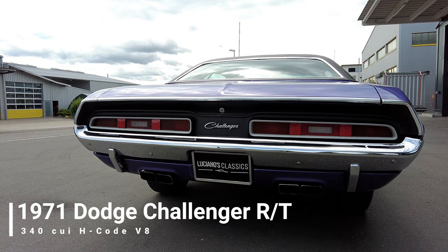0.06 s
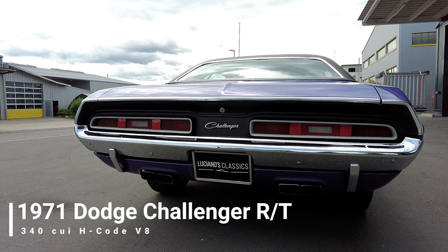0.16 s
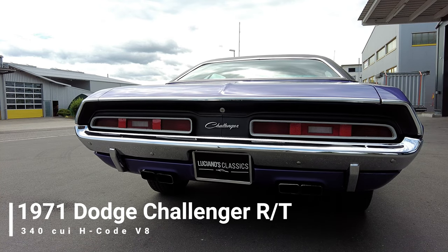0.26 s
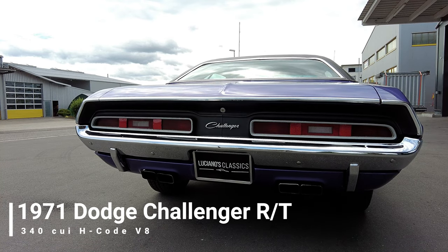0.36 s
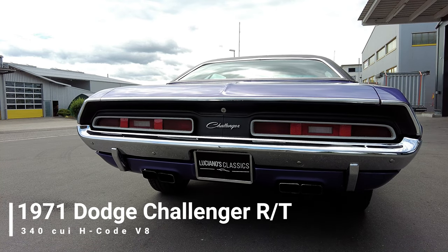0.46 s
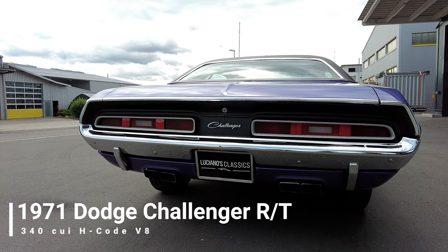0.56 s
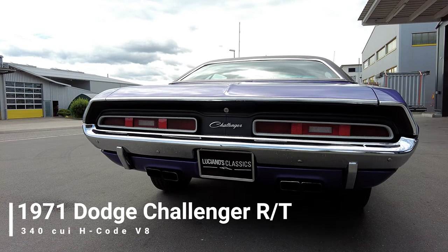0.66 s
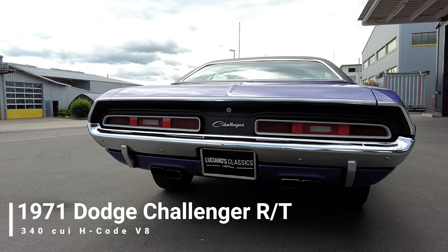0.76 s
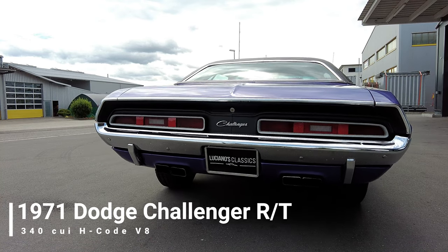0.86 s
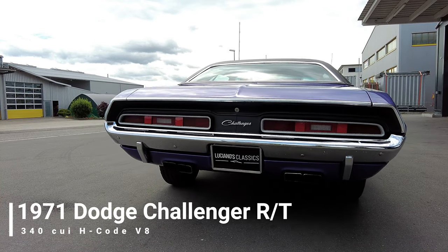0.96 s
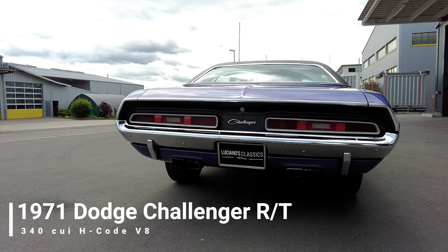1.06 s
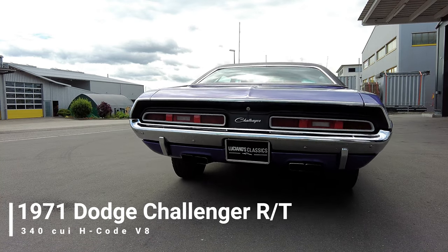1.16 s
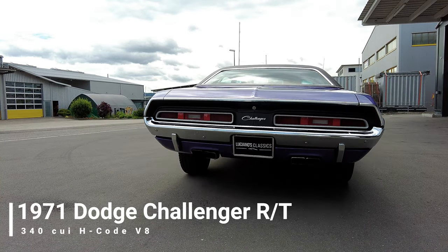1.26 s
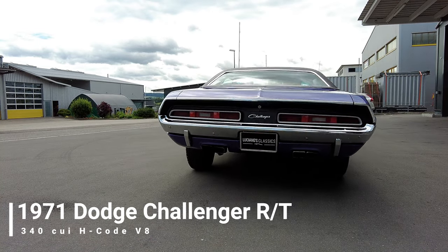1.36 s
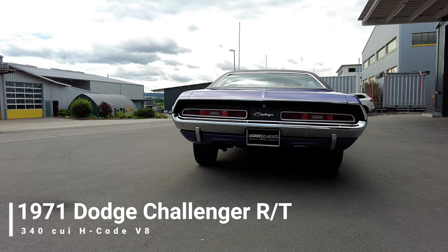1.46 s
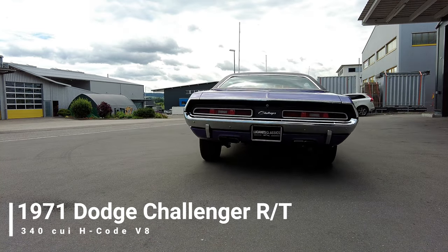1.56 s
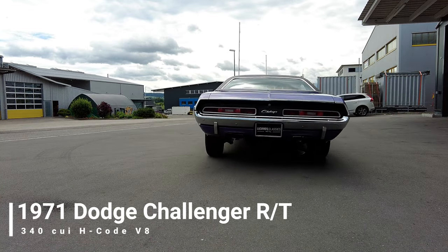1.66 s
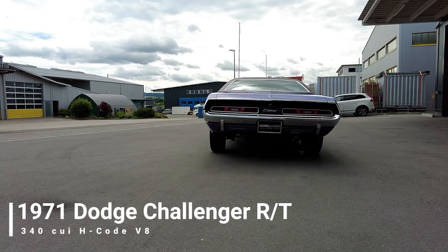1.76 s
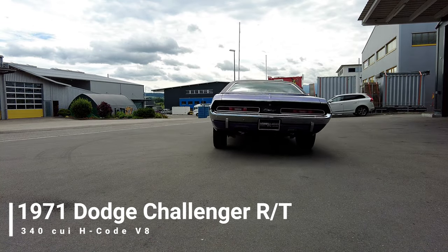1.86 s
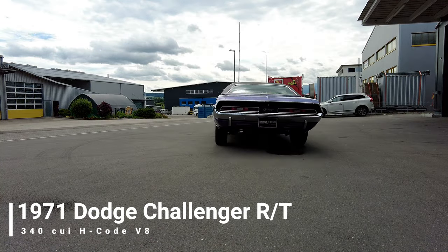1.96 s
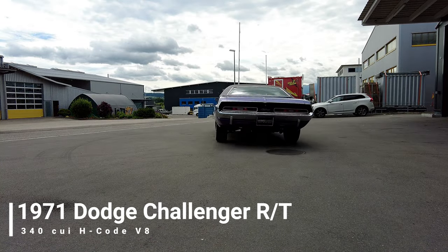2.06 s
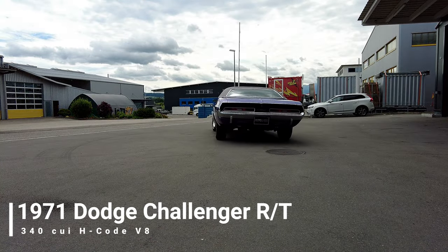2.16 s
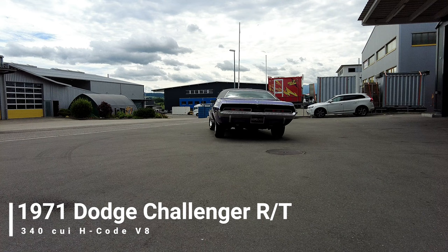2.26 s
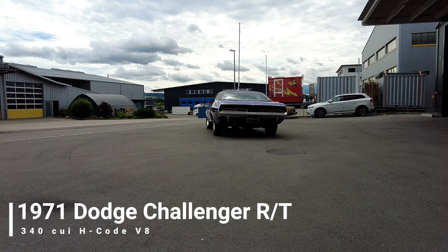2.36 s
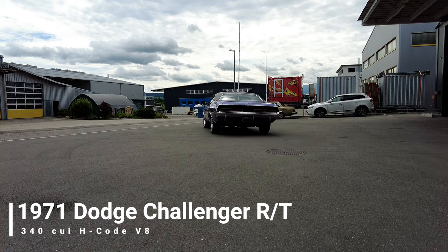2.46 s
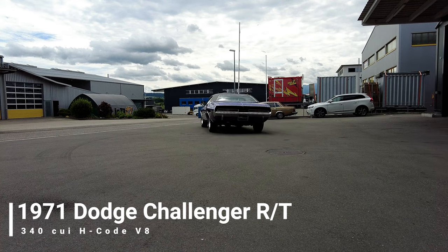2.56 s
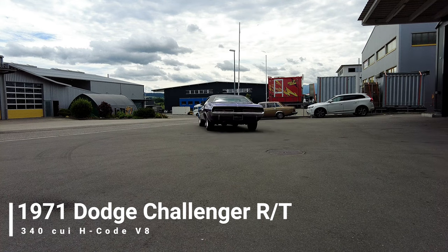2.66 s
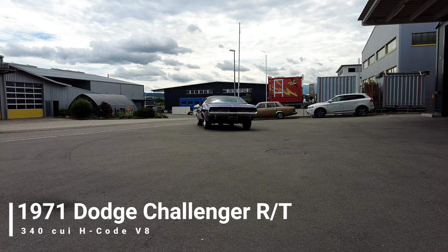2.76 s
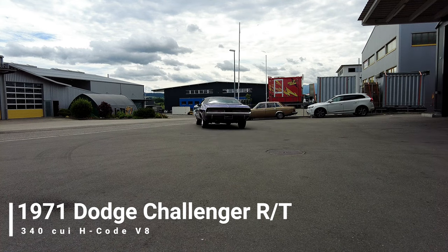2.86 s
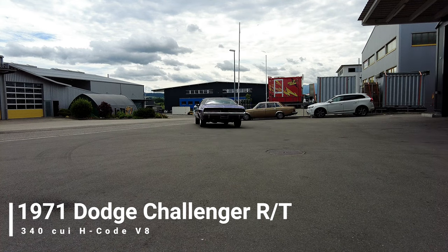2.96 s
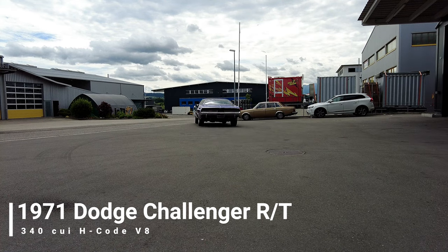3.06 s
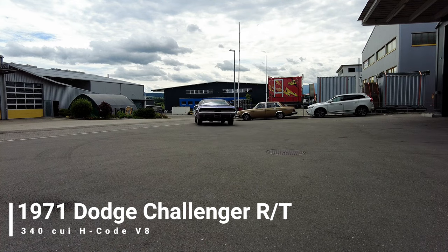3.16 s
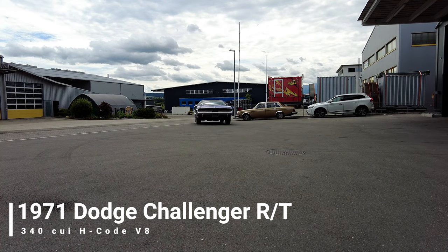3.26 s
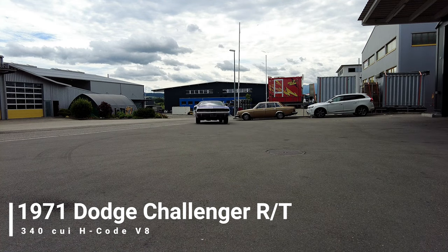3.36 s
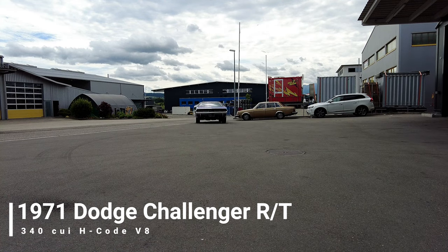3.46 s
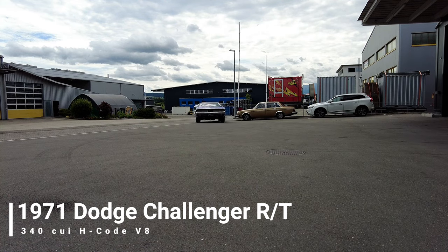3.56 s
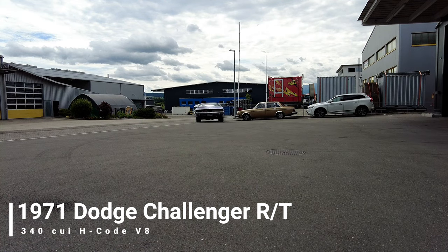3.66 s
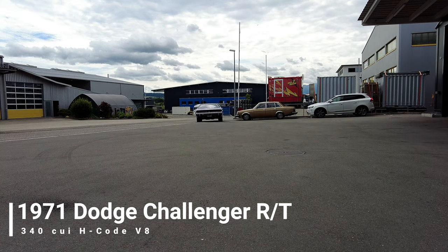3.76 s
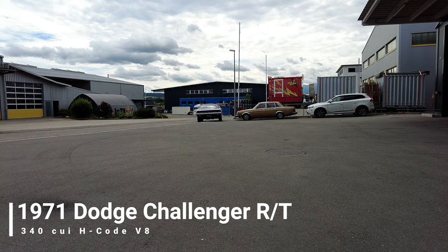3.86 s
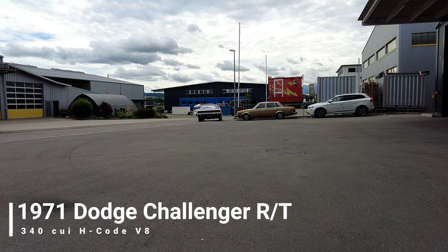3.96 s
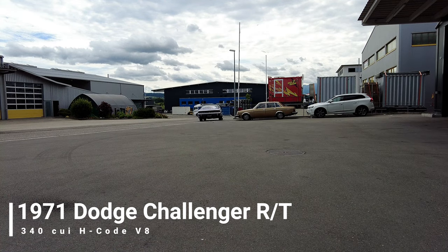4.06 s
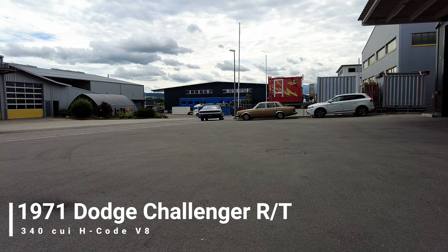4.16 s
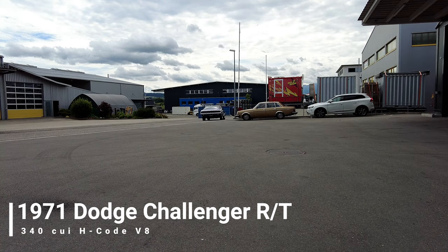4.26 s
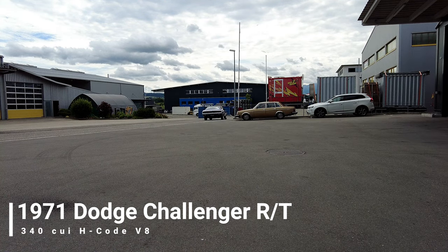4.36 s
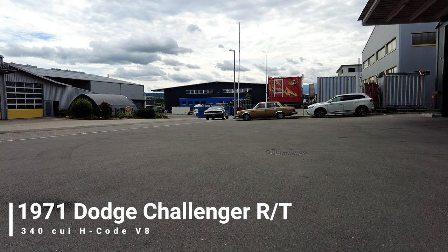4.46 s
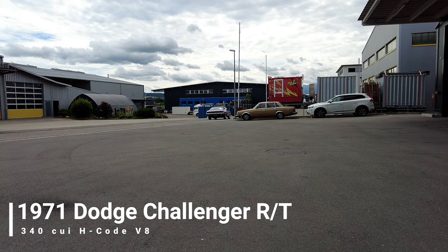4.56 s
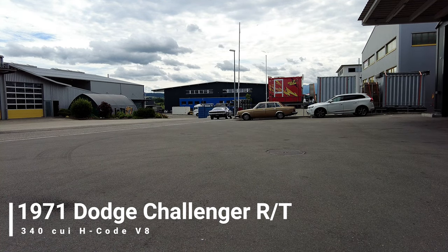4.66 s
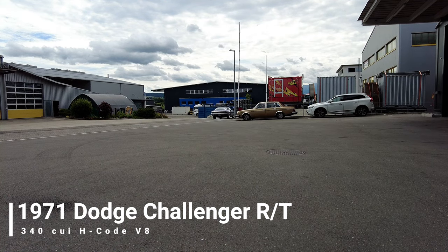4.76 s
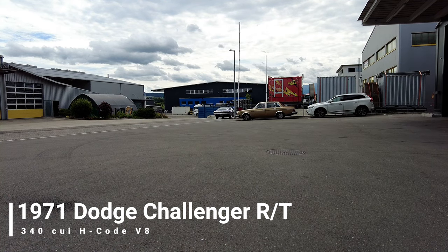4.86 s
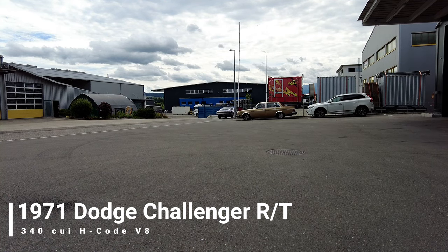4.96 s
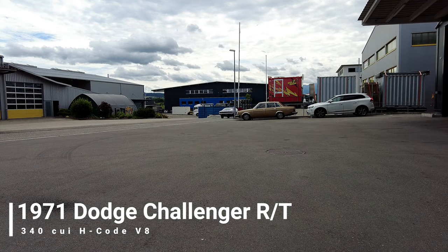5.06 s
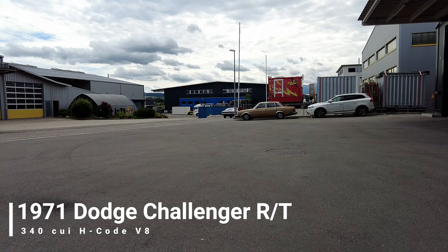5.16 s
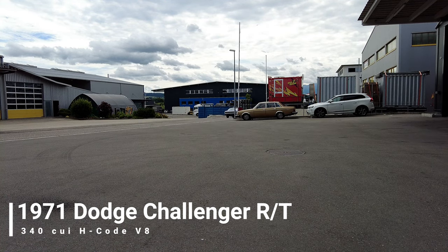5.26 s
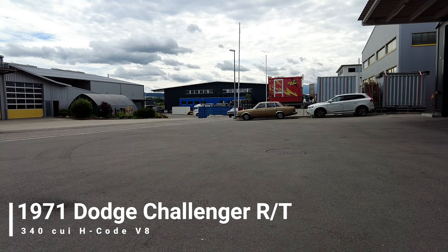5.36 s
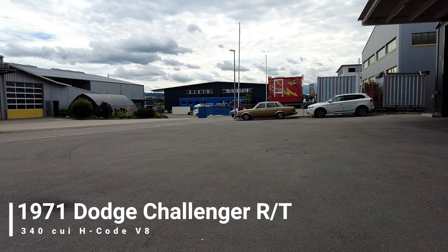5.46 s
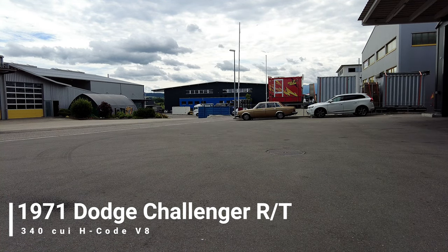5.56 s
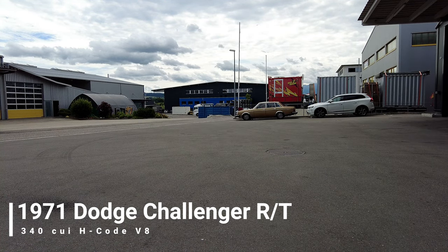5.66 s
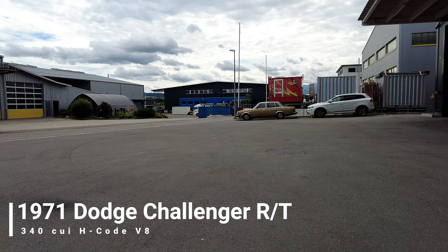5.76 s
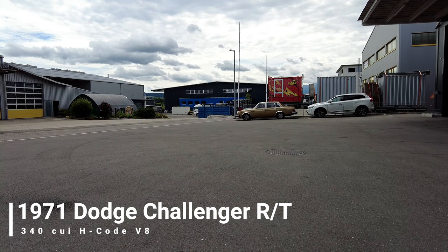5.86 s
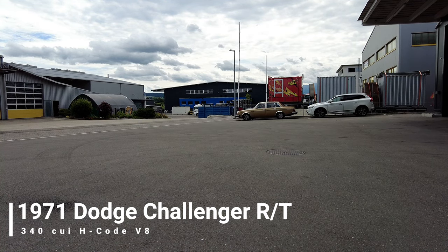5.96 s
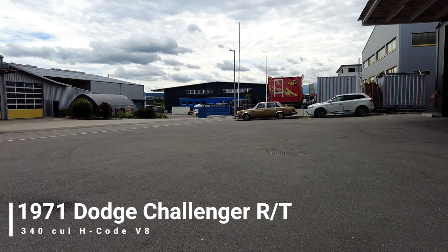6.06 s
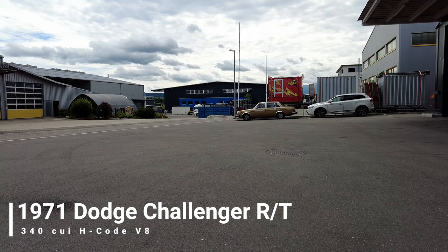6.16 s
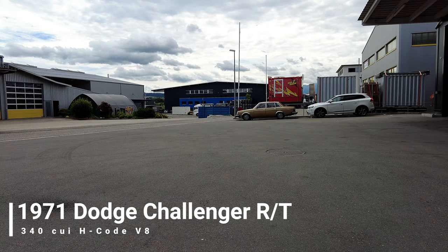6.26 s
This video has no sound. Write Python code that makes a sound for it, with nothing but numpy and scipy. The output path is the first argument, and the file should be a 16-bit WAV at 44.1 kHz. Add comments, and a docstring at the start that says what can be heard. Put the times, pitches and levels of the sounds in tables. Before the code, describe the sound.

A stationary microphone at ground level hears an old V8 muscle car launch from very close. Soft hollow idle puffs and deep boom give way to pops, uneven slaps and a loud exhaust howl with gritty hiss and metallic chirping. The sound shrinks as the car leaves, revs rise to a peak, fall at the shift, and a distant reverberant drone remains among the yard walls.

```python
"""A low idle throb climbs into a hard bark, sags, climbs again and drops at a gear change.
A V8 car is pulling away across a paved yard, heard from just behind its tailpipes.
Uneven exhaust pulses excite the pipe resonances and gate turbulent noise into hiss; multiples of the
engine cycle form boom, rumble and howl. As the path lengthens, the echoes off the walls gain on the
bark, howl and rasp."""
import sys
import numpy as np
from scipy import signal
from scipy.fft import rfft, irfft
from scipy.io import wavfile
from scipy.ndimage import uniform_filter1d

SR = 44100
rng = np.random.default_rng(int(sys.argv[2]) if len(sys.argv) > 2 else 0)


def output_pcm(signal):
    """Save a mono or channel-first signal as 16-bit PCM at the path in sys.argv[1].

    Samples are clipped to [-1, 1] before scaling.
    """
    pcm = np.clip(np.atleast_2d(signal).T, -1, 1) * 32767
    wavfile.write(sys.argv[1], SR, np.round(pcm).astype(np.int16))


N = 278271
TIME = np.arange(N) / SR

# background spectrum of the yard: (f/Hz, relative level/dB)
FLOOR_SPECTRUM = [(25, 8.5), (60, -1), (130, 3), (220, 7.5), (400, -1.5), (1000, -2), (3000, -30),
                  (8000, -63), (15000, -76)]
FLOOR_DB, CUTOFF_HZ = -43, 15400

# engine speed: (t/s, firing rate/Hz)
FIRING_RATE = [(0.0, 39.28), (0.17, 37.32), (0.31, 42.91), (0.45, 81.45), (0.62, 102.66), (0.94, 159.04),
               (1.17, 184.4), (1.42, 192.51), (1.98, 166.9), (2.28, 162.36), (2.85, 182.43), (3.2, 197.31),
               (3.55, 219.77), (3.85, 245.35), (4.11, 243.87), (4.2, 165), (4.42, 157), (6.12, 181),
               (6.31, 182)]
# throttle opening: (t/s, opening 0-1)
THROTTLE = [(0.0, 0.0), (0.3, 0.24), (0.47, 0.72), (0.9, 0.75), (1.0, 0.61), (1.07, 0.82), (1.58, 1.0),
            (1.85, 0.94), (2.7, 0.86), (4.08, 1), (4.2, 0.8), (5.3, 0.75), (6.08, 0.63), (6.31, 0.14)]
# the car stands, gathers speed from the bite of the clutch to the gear change, then rolls on
START_M, CLUTCH_S, SHIFT_S, ACCELERATION_M_PER_S2 = 1.67, 0.57, 3.95, 4.13
CRUISE_PER_S = 180  # reference firing rate

# exhaust pulses in firing order: (relative level/dB, lateness/firing intervals)
CYLINDERS = [(-6.3, .12), (.3, .05), (-3.5, -.1), (-4.2, .11), (-9.3, -.26), (-.1, .04), (-7, .1),
             (-12, -.05)]
# hiss of each cylinder's puff in firing order: relative level/dB
PUFF_DB = [5, 14, 8, 13, 25, -3, 16, -20]
# crack of each cylinder's pressure front in firing order: relative level/dB
CRACK_DB = [-18, 0, -8, -18, -20, -6, -11, -22]
# combustion smooths out as the revs rise: (firing rate/Hz, roughness 0-1)
ROUGH_BY_RATE = [(65, .87), (135, .55), (160, .23), (180, .16)]
FAR_BLUR, BLUR_M, SHIFT_ROUGH, SHIFT_LENGTH_S = .2, 22, .4, .2

# loudness laws: (level/dB at full throttle, cruising revs and the start; loss/dB with throttle shut;
# gain/dB per doubling of revs; loss/dB per doubling of distance; loss/dB per m)
BARK_LAW = (-9, 18, 3, 4, 0.13)
RASP_LAW = (-19.5, 19.5, 4, 2, 0.3255)
HISS_LAW = (-24.5, 19.5, -1.5, 3.0, 0.33)

# engine harmonics: (multiple of the four-stroke cycle rate, near level/dB, far level/dB), relative
RUMBLE_ORDERS = [(2, -4, -9), (3, 0, 0), (4, -5, -3), (5, -12, -4), (6, -9, -9)]
# the howl, the orders that the limping pulses stress most; same columns
HOWL_ORDERS = [(10, 0, -1), (11, 3, -1), (12, -2, 0), (13, -6, 2), (14, -2, -2), (16, 9, 6), (17, -2, -1),
               (18, 8, 6), (19, -5, -2), (20, 8, 0), (21, -1, 8), (22, 7, -2), (23, 5, 6), (24, 7, -4),
               (25, -1, -2), (26, 7, 2), (29, -3, 5), (31, 0, 3), (33, -3, 1), (34, 6, -3), (36, 1, -6),
               (37, -3, 5), (38, 5, -4), (39, -1, -6), (41, 0, -1), (42, 3, 1), (45, 1, -1)]
# what the silencers let through of the howl: (f/Hz, relative level/dB)
HOWL_COLOUR = [(200, -1), (260, -1), (300, 2), (335, 0), (372, 6), (405, 6.5), (440, 4), (480, 2),
               (540, 3.5), (600, 2), (680, -4), (770, 0), (830, 1), (900, -2.5), (1000, -5), (1130, -9)]
# level of the low rumble: (t/s, level/dB)
RUMBLE_LEVEL = [(0, -32), (0.45, -25), (0.95, -21.5), (1.1, -22.5), (1.55, -19), (2.2, -24.5), (3.05, -32),
                (3.5, -31.5), (4.25, -35), (4.8, -40.5), (5.6, -41.5), (6.15, -44.5), (6.31, -47)]
# low orders that swell as the echoes add up: (t/s, multiple of the cycle rate, level/dB, half length/s)
BLOOMS = [(0.492, 5, -17, 0.13), (3.15, 3, -31.5, .24), (3.974, 5, -30, 0.053), (4.207, 8, -35, 0.041),
          (4.38, 4, -43, 0.06), (4.473, 8, -39, 0.046), (4.63, 5, -37, 0.089), (5.087, 4, -47, .13),
          (5.424, 5, -40, 0.14), (6.062, 5, -40, .11)]
# how strongly the pipes pass the boom at full throttle: (firing rate/Hz, level/dB)
BOOM_RESPONSE = [(37, 6), (43, 4.5), (55, 3), (85, -8), (135, -11.5), (165, -16), (177, -19), (188, -30),
                 (205, -22), (245, -20.5)]
# dips in the boom: (t/s, depth/dB, half length/s)
BOOM_DIPS = [(4.13, 11, 0.091), (4.5, 7.5, 0.36), (5.14, 11.7, 0.29), (6.25, 6.6, 0.15)]
BOOM_REACH_M, BOOM_FALLOFF = 9, 1.16  # the boom is halved at this distance; power of its fall beyond
BOOM_SHUT_DB = 10.5  # lost with the throttle shut

# pipe and silencer resonances: (f/Hz, bandwidth/Hz, relative level/dB)
BARK_MODES = [(276, 130, 2.5), (393, 90, 3.5), (501, 240, 5.5), (778, 95, 5)]
RASP_MODES = [(874, 390, 15), (1397, 400, 15.5), (1760, 160, -3), (2490, 460, 3), (3220, 28, -1)]
# hollow puffs at idle; same columns
IDLE_MODES = [(350, 90, 2), (495, 63, 7), (630, 160, 4), (810, 110, -16)]
# valve gear and loose metal; same columns
CLATTER_MODES = [(1900, 160, -0.5), (2770, 880, -7), (4280, 55, -15)]
# high squeaks that pulse with the cycle; same columns
CHIRP_MODES = [(5340, 330, 5.8), (5910, 200, 12.5), (6730, 450, 15), (7420, 500, 10.7), (8430, 680, 8)]
# treble bands that ring as the car gathers speed; same columns
SIZZLE_MODES = [(2870, 230, 1), (3560, 130, 1.5), (4820, 270, -1), (6470, 870, -3.5), (7540, 1260, -4.5)]

# spectrum of the gas jets: (f/Hz, relative level/dB)
HISS_SPECTRUM = [(2000, -110), (3000, -2.5), (3450, -1.5), (4000, -7), (4800, -3), (5350, -5.5),
                 (6400, -2.5), (7900, -4), (9200, -13.5), (10500, -22), (13500, -26.5), (15500, -34)]
# left-right likeness of the hiss: (f/Hz, correlation)
LIKENESS = [(2000, .95), (3200, 0.77), (5000, 0.25), (7000, 0.75), (9000, 1), (14000, 0.53)]
# bouts of thin chirping: (t/s, level/dB, half length/s)
CHIRPS = [(0.84, -32.5, 0.49), (1.196, -35, 0.2), (2.867, -37, 0.043), (5.3, -72, 0.45)]
# exhaust pops as the throttle opens: (t/s, relative level/dB)
POPS = [(0.428, -26), (0.466, -8), (0.49, -12), (0.502, -13), (0.524, -6), (0.546, -18), (0.574, -19),
        (0.586, -26), (0.607, -15), (0.627, -9), (0.635, -10), (0.653, -8), (0.7, -14), (0.732, -23),
        (0.74, -20), (0.765, -20), (0.771, -9.5), (0.795, -23), (0.802, -5), (0.906, -8)]
# dry spits of gas as the idle picks up: (t/s, relative level/dB)
SPITS = [(0.033, -32), (0.09, -22), (0.112, -22.5), (0.166, -25), (0.225, -26), (0.245, -25), (0.289, -18),
         (0.313, -15.5), (0.352, -14), (0.386, -17.5), (0.427, -15), (0.441, -12.5), (0.502, -15),
         (0.534, -16), (0.606, -14)]
# thin squeals of metal and tyres: (t/s, half length/s, f/Hz, bandwidth/Hz, level/dB)
SQUEALS = [(0.25, 0.045, 4450, 59.5, -45), (0.62, 0.042, 1960, 190, -31), (4.094, 0.047, 1380, 50, -34)]
# squeaks of the car rolling on, far off: (t/s, relative level/dB, f/Hz)
FAR_SQUEAKS = [(4.164, -42, 7560), (4.213, -42, 7730), (4.263, -38, 7640), (4.313, -43, 7900),
               (4.364, -45, 7300), (4.408, -48, 5960), (4.462, -43, 7600), (4.465, -41, 5930),
               (4.515, -47, 6940), (4.565, -46, 7100), (4.616, -37, 7400), (4.708, -45, 7110),
               (4.814, -43, 6170), (4.862, -42, 6140), (4.912, -49, 6820), (4.962, -39, 6100),
               (5.01, -45, 6890), (5.105, -48, 7220), (5.155, -38, 7460), (5.202, -44, 7060),
               (5.243, -45, 6070), (5.297, -48, 7040), (5.344, -45, 7140), (5.462, -50, 7120),
               (5.57, -50, 7030)]
# slaps, in firing order: relative level/dB
SLAP_DB = [-40, -6, -11, -12, -14, 0, -12, -40]
SLAP_FRONT_S, SLAP_REACH_M = .00032, 3.1
# echo strength at 1 m, growing with the root of the distance
HOWL_ECHO, RASP_ECHO = .125, .17


def from_db(db):
    """Decibel law: level to amplitude gain."""
    return np.exp(np.asarray(db) * (np.log(10) / 20))


def in_time(rows):
    """Linear interpolation: one curve in time for each column."""
    t, *columns = np.transpose(rows)
    return [np.interp(TIME, t, column) for column in columns]


def at_hz(points):
    """Interpolation on a logarithmic frequency axis, at every FFT bin."""
    hz, value = np.transpose(points)
    return np.interp(np.log(np.arange(N // 2 + 1) * SR / N + 1), np.log(hz), value)


def evened(x):
    """Power normalisation: hold the rms near 1 over about 0.2 s, leaving the pulses intact."""
    power = uniform_filter1d(uniform_filter1d(x * x, size=5000), size=4000)
    return x / np.sqrt(np.abs(power) + 1e-12)


def drift(rate):
    """Random fluctuation: low-passed noise of spread 1, cornered near the rate in Hz."""
    step = 40  # samples between the slow values
    r = np.exp(-2 * np.pi * rate * step / SR)
    white = rng.standard_normal(N // step + 2002)
    slow = signal.lfilter([1], [1, -2 * r, r * r], white)[2000:]
    return np.interp(np.arange(N) / step, np.arange(len(slow)), slow / slow.std())


def swell(at_s, half_s):
    """Gaussian envelope of height 1."""
    return np.exp(-((TIME - at_s) / half_s) ** 2)


def cut(x, hz, kind, order=2):
    """Butterworth filtering, low- or high-pass."""
    return signal.sosfilt(signal.butter(order, min(hz, .45 * SR), kind, fs=SR, output="sos"), x)


def fade(clicks, seconds):
    """Exponential decay: each click becomes a puff that dies away."""
    return signal.lfilter([1], [1, -np.exp(-1 / (seconds * SR))], clicks + 1e-18)


def resonate(x, modes):
    """Modal superposition: parallel damped resonances, all starting in step."""
    out = 0
    for hz, width, db in modes:
        r = np.exp(-np.pi * width / SR)
        poles = [1, -2 * r * np.cos(2 * np.pi * hz / SR), r * r]
        out = out + from_db(db) * (1 - r * r) / 2 * signal.lfilter([1, 0, -1], poles, x + 1e-18)
    return out


def whistle(hz, width_hz):
    """Selective resonance: noise twice through one narrow mode sounds almost as a tone."""
    once = resonate(rng.standard_normal(N), [(hz, width_hz, 0)])
    return evened(resonate(once, [(hz, 2 * width_hz, 0)]))


def clicks_at(s, db):
    """Impulse excitation: one click for each time, of the given height."""
    clicks = np.zeros(N)
    clicks[(np.asarray(s) * SR).astype(int)] = from_db(db)
    return clicks


def steep_front(clicks, front_s, highpass_hz):
    """Steep pressure front: a double decay peaking at each click's height, less its slow part."""
    pulse = fade(fade(clicks, front_s), front_s) * np.e / (front_s * SR)
    return cut(pulse, highpass_hz, "high", order=1)


def puffs(clicks, puff_s, steady):
    """Modulated turbulence: noise that swells after each click, over a steady flow."""
    gate = evened(fade(fade(clicks, puff_s), puff_s / 4)) + steady
    return evened(gate * rng.standard_normal(N))


def grit(depth_db, rate=110):
    """Intermittent turbulence: two noises whose third-octave bands flare up in brief grains."""
    edges = np.geomspace(1800, 16000, 10)
    white = rng.standard_normal((2, 2, N))
    out = 0
    for k in range(len(edges) - 1):
        band = signal.butter(2, edges[k:k + 2], "band", fs=SR, output="sos")
        out = out + signal.sosfilt(band, white[k % 2]) * from_db(depth_db * drift(rate))
    return out


def distance():
    """Uniform acceleration, then steady speed: metres from the tailpipes."""
    speed = ACCELERATION_M_PER_S2 * np.clip(TIME - CLUTCH_S, 0, SHIFT_S - CLUTCH_S)
    return START_M + np.cumsum(speed) / SR


def loudness(law, throttle, per_s, metres):
    """Source strength and spreading: a layer's dB rises with throttle, varies with revs, falls with distance."""
    full_db, shut_db, revs_db, spreading_db, db_per_m = law
    return (full_db - shut_db * (1 - throttle) + revs_db * np.log2(per_s / CRUISE_PER_S)
            - spreading_db * np.log2(metres / START_M) - db_per_m * metres)


def boom_level(per_s, throttle, metres):
    """Forced response: the firing rate sweeps through the pipes' response while the car recedes."""
    source_db = np.interp(per_s, *np.transpose(BOOM_RESPONSE)) - BOOM_SHUT_DB * (1 - throttle)
    dips_db = sum(depth_db * swell(s, half_s) for s, depth_db, half_s in BOOM_DIPS)
    return source_db - 20 * np.log10(1 + (metres / BOOM_REACH_M) ** BOOM_FALLOFF) - dips_db


def roughness(per_s, metres):
    """Cyclic irregularity: lumpy at idle, smooth at high revs, ragged at the shift, blurred far off."""
    combustion = np.interp(per_s, *np.transpose(ROUGH_BY_RATE))
    blur = FAR_BLUR * np.minimum(metres / BLUR_M, 1)
    return combustion + blur + SHIFT_ROUGH * swell(SHIFT_S + SHIFT_LENGTH_S / 2, SHIFT_LENGTH_S)


def once_a_cycle(firings, at_firing, sharpness):
    """Periodic gating: a bump of height 1 at the same point of every engine cycle."""
    return np.exp(sharpness * (np.cos(2 * np.pi * (firings - at_firing) / len(CYLINDERS)) - 1))


def valve_pulses(firings, cylinder_db, rough):
    """Pulse train: one click per exhaust valve opening; the crossplane crank makes a fixed limp."""
    opening, jitter, spread_db = .17, .03, 1.6  # firing intervals, firing intervals, dB
    number = np.arange(int(firings[-1]) - 1)
    cylinder = number % len(CYLINDERS)
    chance = rng.standard_normal((len(number), 2)) * np.interp(number, firings, rough)[:, None]
    due = number + opening + np.array(CYLINDERS)[cylinder, 1] + jitter * chance[:, 0]
    at = np.minimum(np.searchsorted(firings, due), N - 1)
    clicks = np.zeros(N)
    clicks[at] = from_db(np.array(cylinder_db)[cylinder] + spread_db * chance[:, 1])
    return clicks


def rung_from_rest(table, size=128):
    """Minimum phase: the orders start together and ring out, as in a struck pipe."""
    k, db, _ = np.transpose(table)
    index = k.astype(int)
    gains = np.full(size // 2 + 1, from_db(-14.))
    colour_db = np.interp(k * CRUISE_PER_S / len(CYLINDERS), *np.transpose(HOWL_COLOUR))
    gains[index] = from_db(db + colour_db)
    # the one-sided cepstrum of the log gains yields the phase
    return np.pi + 2 * rfft(irfft(np.log(gains))[:size // 2], size).imag[index]


def orders(firings, metres, table, wander_db, near_m, far_m,
           at_firing=1.1, scatter=1.05, flutter=.33, spread=.007):
    """Fourier synthesis of cycle multiples, low ones trailing; a long path makes their phases waver."""
    far = np.interp(np.log(metres), np.log([near_m, far_m]), [0, 1])
    waver = flutter * np.clip(metres / BLUR_M, .1, 1)
    turn = 2 * np.pi * (firings - at_firing) / len(CYLINDERS)
    out = 0
    for (k, near_db, far_db), phase in zip(table, rung_from_rest(table)):
        level_db = near_db + far * (far_db - near_db) + wander_db * drift(1.45)
        trailing = spread * (table[-1][0] - k) ** 2
        chance = (scatter + far) * rng.standard_normal() + waver * drift(4)
        out = out + from_db(level_db) * np.cos(k * turn + phase + trailing + chance)
    return evened(out)


def yard_floor():
    """Stationary noise: the steady background, shaped by its spectrum."""
    gain = from_db(at_hz(FLOOR_SPECTRUM))
    return from_db(FLOOR_DB) * evened(irfft(rfft(rng.standard_normal(N)) * gain, N))


def yard(x, first_s=0.033, t60=1.0, wall_hz=3500):
    """Reverberation: scattered echoes from sheds and containers, dulled and dying away."""
    t = TIME[:SR]
    sparse = rng.standard_normal(SR) * (rng.random(SR) < 500 / SR)
    walls = sparse * (t > first_s) * from_db(-60 * t / t60)
    return cut(signal.fftconvolve(x, walls / np.linalg.norm(walls))[:N], wall_hz, "low")


def with_walls(x, metres, strength):
    """Direct-to-reverberant ratio: the yard's share of a sound grows with distance."""
    echo = strength * np.sqrt(metres)
    return (x + echo * yard(x)) / np.sqrt(1 + echo ** 2)


def far_squeaks(level_db=-8, rise_s=0.0029, width_hz=420, size=2048):
    """Narrow-band bursts: each squeak is a short swell of noise at a pitch of its own."""
    out, age = np.zeros(N + size), TIME[:size] / rise_s
    for s, db, hz in FAR_SQUEAKS:
        ring = [(hz, width_hz, 0)]
        tone = resonate(resonate(rng.standard_normal(size), ring), ring)
        start = int(s * SR)
        out[start:start + size] += from_db(db + level_db) * age * np.exp(1 - age) * tone / tone.std()
    return out[:N]


def squeals():
    """Narrow-band resonance: brief thin tones, metal as the revs rise, tyres at the gear change."""
    return sum(from_db(db) * swell(s, half_s) * whistle(hz, width) for s, half_s, hz, width, db in SQUEALS)


def far_tone(firings, metres, level_db=-44, at_s=5.2, half_s=1.0, hz=390, width_hz=55):
    """Resonant transmission: after the gear change, orders passed by one pipe mode carry farthest."""
    ring = [(hz, width_hz, 0)]
    howl = orders(firings, metres, HOWL_ORDERS[7:13], wander_db=2, near_m=4, far_m=6)
    return from_db(level_db) * swell(at_s, half_s) * evened(yard(resonate(resonate(howl, ring), ring)))


def close_sounds(clicks, metres, clatter_db=-33, flutter_db=-30):
    """Inverse-distance law: metal clatter and the low flutter of the gas fade as the car leaves."""
    clatter = evened(resonate(puffs(clicks, puff_s=0.0057, steady=1.0), CLATTER_MODES))
    flutter = evened(cut(cut(rng.standard_normal(N), 110, "low", order=4), 70, "high"))
    return (from_db(clatter_db) * cut(clatter, 3000, "low") + from_db(flutter_db) * flutter) / metres


def chirp(firings, at_firing=1.2, sharpness=1.6, fickle_db=4.5):
    """Gated resonance: squeaks around the strongest pulse, with a lesser burst half a cycle on."""
    gate = once_a_cycle(firings, at_firing, sharpness) + .5 * once_a_cycle(firings, 5.35, 14)
    squeak = 0
    for hz, width, db in CHIRP_MODES:
        catch_db = fickle_db * np.clip(drift(30), -2, 1.5)  # each resonance catches by chance
        squeak = squeak + from_db(db + catch_db) * whistle(hz, width)
    bouts = sum(from_db(db) * swell(s, half_s) for s, db, half_s in CHIRPS)
    return bouts * evened(gate * squeak)


def ticks(firings, at_firing=1.49, sharpness=49.0, at_s=1.34, half_s=0.36,
          level_db=-37, hz=9000, width_hz=1300):
    """Gated resonance: the two strongest pulses of each cycle spit a thin, bright tick for a while."""
    gate = np.exp(sharpness * np.cos(4 * np.pi * (firings - at_firing) / len(CYLINDERS)))
    ring = [(hz, width_hz, 0)]
    bright = evened(resonate(resonate(gate * rng.standard_normal(N), ring), ring))
    return from_db(level_db) * swell(at_s, half_s) * bright


def sizzle(firings, level_db=-35, at_s=2.22, half_s=0.6, pulsing=1.0):
    """Selective resonance: narrow treble bands ring over the hiss, pulsing once per cycle."""
    gas = (1 + pulsing * once_a_cycle(firings, 0.39, 9.5)) * rng.standard_normal(N)
    bands = 0
    for hz, width, db in SIZZLE_MODES:
        bands = bands + resonate(resonate(gas, [(hz, width, db)]), [(hz, 2 * width, 0)])
    return from_db(level_db) * swell(at_s, half_s) * evened(bands)


def idle_puffs(clicks, level_db=-36, at_s=0.16, half_s=0.71):
    """Cavity resonance: at idle the gas leaves in soft, hollow puffs."""
    hollow = resonate(puffs(clicks, puff_s=0.0031, steady=0.53), IDLE_MODES)
    return from_db(level_db) * swell(at_s, half_s) * evened(cut(hollow, 1050, "low", order=4))


def spits(level_db=-5, rise_s=0.0012, decay_s=0.0066):
    """Transient excitation: short dry puffs ring the thin metal of the tailpipes."""
    gate = fade(fade(clicks_at(*np.transpose(SPITS)), decay_s), rise_s) / (rise_s * SR)
    metal = [(1640, 550, 5.5), (3230, 600, 3), (4260, 480, -4), (5440, 900, -3)]
    ring = resonate(rng.standard_normal(N), metal)
    return from_db(level_db) * gate * evened(cut(ring, 7300, "low", order=4))


def hiss(clicks, metres, bounce=0.48, heights_m2=0.055, reach_m=4.8, grit_db=4.5):
    """Jet noise and interference: the bounce off the asphalt sweeps a comb upward as the car leaves."""
    gate = evened(fade(fade(clicks, seconds=0.036), seconds=0.00045)) + 3.3
    colour, alike = from_db(at_hz(HISS_SPECTRUM)), np.clip(at_hz(LIKENESS), -1, 1)
    lag = 2 * heights_m2 / metres / 343  # extra path over the speed of sound in m/s
    near = 1 / (1 + (metres / reach_m) ** 4)
    parts = []
    for sign, grains in zip((1, -1), grit(grit_db * (1 + near) / 2)):
        jet = irfft(rfft(gate * grains) * colour * np.sqrt(1 + sign * alike), N)
        parts.append(jet + bounce * near * np.interp(TIME - lag, TIME, jet))
    mid, side = parts
    return evened(mid) + evened(side) * side.std() / mid.std() * np.array([[1], [-1]])


def blooms(firings):
    """Constructive interference: single low orders swell up and sink back."""
    turn = 2 * np.pi * firings / len(CYLINDERS)
    out = 0
    for s, k, db, half_s in BLOOMS:
        out = out + np.sqrt(2) * from_db(db) * swell(s, half_s) * np.sin(-round(k) * turn)
    return out


def pops(front_s=0.00022, front_db=2, tail_s=0.0067, tail_db=-9, top_hz=2600):
    """Impulsive release: a steep pressure front, then a short gust through the pipe resonances."""
    clicks = clicks_at(*np.transpose(POPS))
    front = steep_front(clicks, front_s, 160)
    gust = cut(evened(resonate(rng.standard_normal(N), BARK_MODES)), 330, "high")
    tail = fade(clicks, tail_s) * gust
    return cut(-from_db(front_db) * front + from_db(tail_db) * tail, top_hz, "low")


def slaps(firings, metres, level_db=-4, from_s=0.82):
    """Steep wavefronts: uneven cylinders send out pressure slaps, heard close by."""
    clicks = valve_pulses(firings, SLAP_DB, np.full(N, .9))
    front = steep_front(clicks, SLAP_FRONT_S, 150)
    onset = np.clip((TIME - from_s) * 20 + 1, 0, 1)
    return -from_db(level_db) * front * onset / (1 + (metres / SLAP_REACH_M) ** 4)


def drone(firings, metres, rough, boom_db, rumble_db, overtone_db=-27, burble_db=0):
    """Periodic forcing: boom at the firing rate, rumble of the uneven banks, burble when rough."""
    turn = 2 * np.pi * firings
    boom = -np.sqrt(2) * (np.sin(turn) + from_db(overtone_db) * np.cos(2 * turn))
    low_noise = cut(rng.standard_normal(N), 245, "low")
    burble = evened(resonate(low_noise, [(70.5, 220, -12.0), (154, 130, 0)]))
    wander_db = 2.9 + np.minimum(metres / 25, 1.5)
    rumble = orders(firings, metres, RUMBLE_ORDERS, wander_db, near_m=2.1, far_m=11)
    rumble = rumble + from_db(burble_db) * rough * burble
    return from_db(boom_db) * boom + from_db(rumble_db) * rumble


def pipes(firings, metres, rough, bark_db, rasp_db):
    """Pipe resonance: low modes bark and howl, upper ones rasp, the steepest fronts crack."""
    clicks = valve_pulses(firings, np.array(CYLINDERS)[:, 0], rough)
    fronts = valve_pulses(firings, CRACK_DB, rough + 1.4)

    pressure = -np.clip(1.4 - rough, 0, 1) * evened(clicks)
    turbulence = rough * puffs(clicks, puff_s=0.02, steady=0.97)
    bark = resonate(pressure + turbulence, BARK_MODES)
    bark = evened(cut(cut(bark, 763, "low"), 215, "high"))

    rasp = resonate(puffs(fronts, puff_s=0.0016, steady=1.5), RASP_MODES)
    rasp = evened(cut(cut(rasp, 2590, "low", order=4), 710, "high"))

    crack = cut(fade(fronts, seconds=0.00011), 2020, "low", order=4)
    crack = -evened(cut(crack, 330, "high", order=1))
    crack = crack * np.clip(1.05 - rough, 0, 1) / (1 + (metres / 5.5) ** 2)

    wander_db = .6 + np.minimum(metres / 11, 2)
    howl = orders(firings, metres, HOWL_ORDERS, wander_db, near_m=3.8, far_m=6.3)
    howl = evened(irfft(rfft(howl) * from_db(at_hz(HOWL_COLOUR)), N))

    pitched = np.clip(1.11 - 1.22 * rough, 0, 1)  # smooth running favours the howl
    low = from_db(bark_db) * evened(np.sqrt(1 - pitched) * bark + np.sqrt(pitched) * howl)
    high = from_db(rasp_db) * (rasp + crack)
    return with_walls(low, metres, HOWL_ECHO) + with_walls(high, metres, RASP_ECHO)


def scene():
    """Superposition: engine speed times the pulses and orders; throttle and distance set main levels."""
    (per_s,), (throttle,), (rumble_db,) = in_time(FIRING_RATE), in_time(THROTTLE), in_time(RUMBLE_LEVEL)
    metres = distance()
    rough = roughness(per_s, metres)
    firings = np.cumsum(per_s) / SR  # running count
    bark_db, rasp_db, hiss_db = [loudness(law, throttle, per_s, metres)
                                 for law in (BARK_LAW, RASP_LAW, HISS_LAW)]
    boom_db = boom_level(per_s, throttle, metres)
    jet_clicks = valve_pulses(firings, PUFF_DB, rough + .5)

    background = yard_floor() + far_squeaks() + squeals() + far_tone(firings, metres)
    mechanical = close_sounds(jet_clicks, metres) + chirp(firings) + ticks(firings)
    jets = sizzle(firings) + idle_puffs(jet_clicks) + spits() + from_db(hiss_db) * hiss(jet_clicks, metres)
    exhaust = blooms(firings) + pops() + slaps(firings, metres)
    exhaust = exhaust + drone(firings, metres, rough, boom_db, rumble_db)
    exhaust = exhaust + pipes(firings, metres, rough, bark_db, rasp_db)
    return background + mechanical + jets + exhaust


def record(dry):
    """Saturation and band limiting: the highest peaks are squashed, the top is cut."""
    limited = dry / (1 + dry ** 8) ** (1 / 8)
    return signal.sosfilt(signal.ellip(10, .1, 90, CUTOFF_HZ, fs=SR, output="sos"), limited)


dry = scene()
out = record(dry)
output_pcm(out)
```